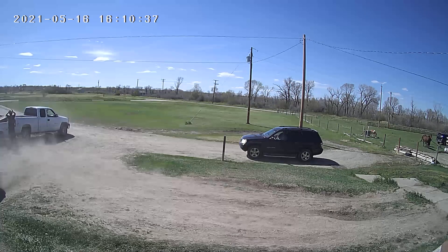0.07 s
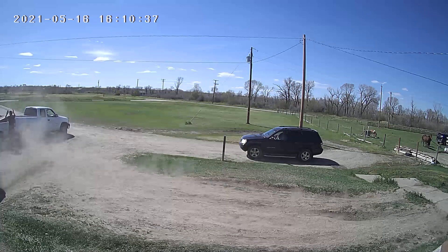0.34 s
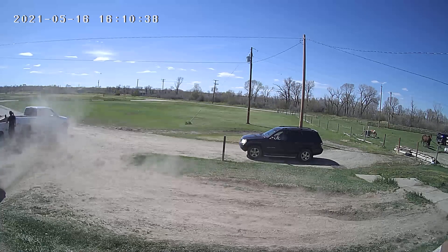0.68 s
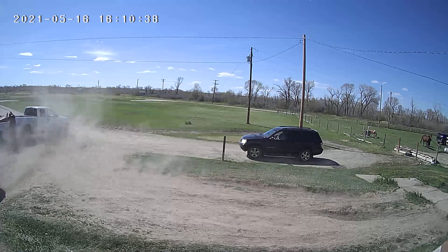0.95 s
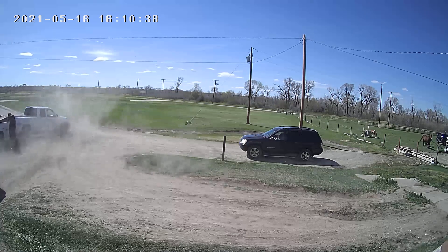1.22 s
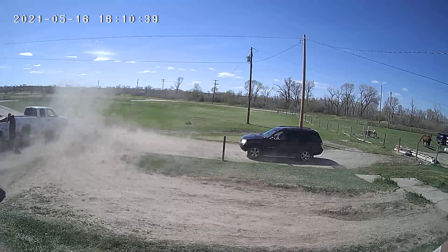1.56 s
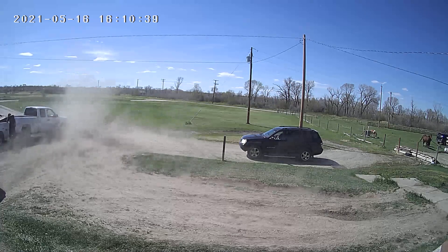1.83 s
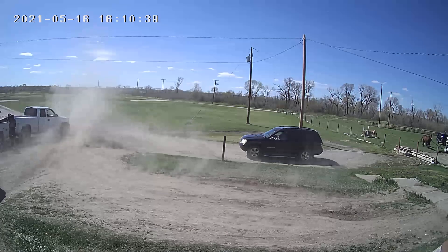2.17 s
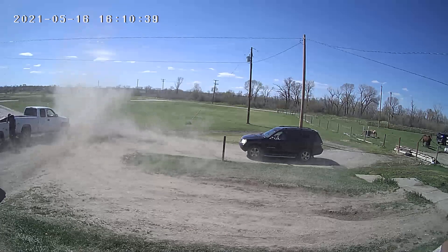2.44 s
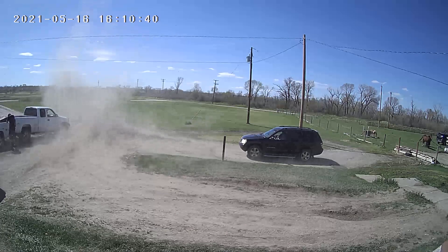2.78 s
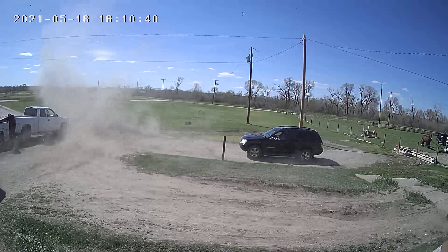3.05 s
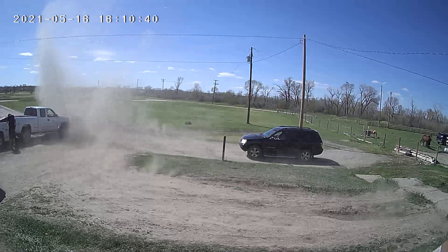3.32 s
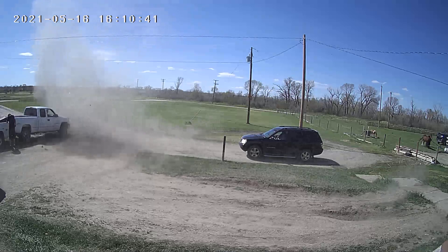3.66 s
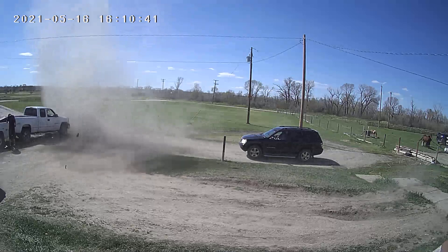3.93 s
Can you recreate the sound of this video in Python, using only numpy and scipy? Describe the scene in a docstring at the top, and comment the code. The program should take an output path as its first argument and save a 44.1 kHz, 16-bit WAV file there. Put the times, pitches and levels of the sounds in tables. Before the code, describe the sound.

Rough wind buffets a microphone outdoors, sounding narrow and distorted. A heavy opening gust breaks into choked bursts that pop and crackle; after a final big push, the wind drops and a thin whistle flares.

```python
"""Gusty wind hits a small outdoor microphone, heard through a narrow channel. It opens on a strong gust
that drives the diaphragm against its limits in rough, lopsided thumps. From 1 s the wind turns choppy:
eddies break through as hard pops, a thin whistling hiss shows in the lulls, and the hardest slaps
overload the channel and crackle. Sustained pushes pin the diaphragm and choke the sound; at 1.7 s it
briefly drops out. A last big shove lands at 3.3 s, then the wind sinks and the whistle flares."""
import sys
import numpy as np
from scipy import signal
from scipy.fft import rfft, irfft, next_fast_len
from scipy.io import wavfile
from scipy.ndimage import map_coordinates

SR = 44100
rng = np.random.default_rng(int(sys.argv[2]) if len(sys.argv) > 2 else 0)


def wav_out(sig):
    """Save sig, one row per channel (or a flat mono array), as 16-bit PCM at SR to the path in sys.argv[1]."""
    wavfile.write(sys.argv[1], SR, np.round(np.clip(np.atleast_2d(sig).T, -1, 1) * 32767).astype(np.int16))


N = 176400

# Gust envelope: t/s, force level/dB re the diaphragm's limit, fine eddies level/dB re the force
GUSTS = [(0, 11.5, -13.5), (.15, 5, -15), (.27, 10, -16.5), (.42, 11.5, -25.5), (.5, 10.5, -11.5),
         (.6, 3, -16), (.69, 3.5, -9.5), (.83, 6.5, -11), (.89, 7, -26), (.92, -0.5, -37), (.96, -22.5, -4),
         (.99, 6.5, -30.5), (1.02, -9.5, -13.5), (1.08, -2, -29.5), (1.12, -12.5, -19), (1.22, -5.5, -13.5),
         (1.27, 2, -5), (1.35, 3, -8), (1.45, 3.5, 2), (1.57, -0.5, -7), (1.68, -13.5, -6.5),
         (1.75, -2, -24), (1.84, 1.5, -30), (2.01, 2.5, -1), (2.05, -18, -6), (2.09, -15, -6.5),
         (2.12, 0, -33), (2.16, 10, -13.5), (2.21, -19.5, -10), (2.28, 10, -15), (2.36, -1.5, -11.5),
         (2.45, -7, -17), (2.53, 0, -2.5), (2.63, 3, 0), (2.69, -6, -12.5), (2.8, -3, -4), (2.92, -5, -1),
         (2.98, 10, -13), (3.16, 6, -2), (3.21, -7.5, -17), (3.26, -11.5, -9.5), (3.3, 28, -39),
         (3.35, -26, -7.5), (3.43, -11.5, -12.5), (3.47, -26, -9), (3.55, -10.5, -20), (3.63, -26, -10.5),
         (3.67, -6, -29.5), (3.72, -14, -22.5), (3.8, -10, -20.5), (3.86, -36.5, -6), (3.91, -11.5, -14),
         (3.95, -17, -11.5), (4, -11, -31)]
# Mean push that holds the diaphragm to one side: t/s, level/dB re the eddies
LEAN = [(0, -8.5), (.85, -1.5), (1.2, 10), (1.35, 1), (1.6, 5.5), (1.9, 7), (2.1, 6), (2.3, -3), (2.55, 2),
        (2.9, 6), (3.1, -2.5), (3.35, 5), (3.55, -27.5), (4, 2)]
# Sustained pushes that pin the diaphragm: centre t/s, length/s, level/dB re the eddies
STALLS = [(0.035, 0.021, 13.5), (0.099, 0.022, 7), (0.432, 0.014, 19.5), (0.581, 0.006, 25),
          (1.275, 0.012, 34), (1.399, 0.018, 12), (1.47, 0.0087, 26.5), (1.545, 0.017, 26),
          (1.615, 0.03, 14.5), (1.675, 0.017, 8), (1.697, 0.067, 28.5), (1.787, 0.025, 26),
          (1.842, 0.014, 22.5), (1.958, 0.012, 12), (2.18, .018, 27.5), (2.383, 0.017, 13.5),
          (2.552, 0.013, 11.5), (2.707, 0.014, 16.5), (2.831, 0.025, 12.5), (2.859, 0.022, 22),
          (2.923, 0.014, 23.5), (2.964, 0.018, 10.5), (3.193, 0.018, 17), (3.351, .05, 33.5)]
# Rumble of the big eddies: f/Hz, level/dB
RUMBLE_EQ = [(25, -8), (60, 2), (110, -2), (200, -7), (400, -20.5), (800, -50), (2000, -62), (5000, -100)]
# Midrange rasp of the fine eddies: f/Hz, level/dB
RASP_EQ = [(80, -14.5), (250, -4.5), (500, 3.5), (900, -5.5), (1500, -13.5), (2200, -20.5), (3200, -21),
           (4500, -26.5)]
def wind():
    """Pressure at the port: big eddies, puffs of fine ones and a one-sided push that comes and goes."""
    force_db, fine_db = curves(GUSTS)
    lean_db, = curves(LEAN)
    puffs = amp(flutter(depth_db=6, per_second=190)) * noise(RASP_EQ)
    surges = amp(flutter(depth_db=2.5, per_second=55))
    eddies = surges * (noise(RUMBLE_EQ) + amp(fine_db) * puffs / puffs.std())
    lean = amp(lean_db + flutter(depth_db=4, per_second=90))
    stalls = sum(amp(db) * gate(t, length) for t, length, db in STALLS)
    return amp(force_db) * (eddies + lean + stalls)


# Slaps of air: centre t/s, length/s, force level/dB, sputter level/dB re the force
BUFFETS = [(0.058, 0.011, -4, 0), (0.132, 0.033, -1.5, -9.5), (0.262, .006, 17, -2.5),
           (0.277, 0.012, 2, -1.5), (0.331, 0.0052, -0.5, 2.5), (0.453, 0.0087, 11.5, 0.5),
           (0.477, 0.012, 19, -20), (0.485, 0.0062, 4.5, 5), (0.814, .036, -1, -8),
           (0.988, 0.0094, -6, -2.5), (1.411, 0.028, 4.5, 8), (1.451, 0.0047, 11, -3.5),
           (1.491, 0.0051, 13.5, 4), (1.516, 0.03, 5, -3.5), (1.566, 0.0063, 2, -2.5),
           (1.645, 0.017, -6.5, -3), (1.659, 0.0052, -5.5, -1), (1.75, 0.025, -3, -4.5),
           (1.776, 0.013, -7, 6), (1.853, 0.021, -7.5, -3.5), (1.882, 0.017, -6.5, -6.5),
           (1.982, 0.028, -12, -13.5), (2.146, 0.009, -3, -2.5), (2.538, 0.0077, 12, -4),
           (2.559, 0.0091, -2.5, 2), (2.625, 0.012, -1.5, 2.5), (2.685, 0.026, 4, -9.5),
           (2.75, 0.012, 4.5, -9), (2.861, 0.0024, -6, -2.5), (2.888, 0.0045, -22.5, 5.5),
           (2.905, 0.013, -5.5, 5.5), (2.996, 0.022, -2, -7), (3.058, 0.0097, 5.5, -12.5),
           (3.098, .03, 7.5, -11), (3.128, 0.021, -5, 2.5), (3.154, 0.012, 1.5, 4.5),
           (3.301, .04, 1.5, -11), (3.433, 0.021, -12.5, -13.5)]
# Low body of a buffet: f/Hz, level/dB
THUMP_EQ = [(40, -35.5), (90, 4), (160, 2), (260, 2.5), (450, -6.5), (900, -47.5), (3000, -93.5)]
def buffets(pressure):
    """Each buffet takes over from the wind and knocks the diaphragm free with a thump and a sputter."""
    thump = noise(THUMP_EQ) + 0.76  # one-sided push
    sputter = amp(flutter(depth_db=6.5, per_second=300)) * noise(RASP_EQ)
    for t, length, db, sputter_db in BUFFETS:
        mix = gate(t, length)
        pressure = (1 - mix) * pressure + mix * amp(db) * (thump + amp(sputter_db) * sputter)
    return pressure


def diaphragm(pressure):
    """Follows the pressure up to its limit and barely gives beyond; a held deflection leaks away."""
    give, trim_db = 0.058, -9
    travel = soft_clip(pressure, knee=2.4) + give * np.arcsinh(pressure)
    bass_cut = signal.butter(2, 109, "high", fs=SR, output="sos")
    return amp(trim_db) * signal.sosfilt(bass_cut, travel)


# Single eddies, big ones thump and small ones pop: centre t/s, level/dB, f/Hz
POPS = [(.371, -7.5, 400), (.818, -9.5, 200), (.979, -8.5, 742), (1.331, -7.5, 653), (1.481, -13.5, 646),
        (1.583, -6.5, 810), (1.683, -9.5, 682), (1.692, -12, 508), (1.746, -10, 123), (1.824, -9, 150),
        (1.929, -12.5, 580), (1.953, -8, 796), (2.0, -10, 1160), (2.058, -16, 550), (2.12, -5, 109),
        (2.149, -6.5, 221), (2.169, -14, 620), (2.61, -10, 1057), (2.686, -2.5, 200.3), (2.743, -8.5, 1400),
        (2.879, -11, 800), (2.976, -6.5, 210), (3.008, -6, 488), (3.37, -18.5, 460)]
# Bright grit on pops and cracks: f/Hz, level/dB
RATTLE_EQ = [(200, -12.5), (900, 3), (2000, -5.5), (2900, -1.5), (4000, -8), (5000, -4)]
def pops(x):
    """Each single eddy ducks the wind and swings the diaphragm a few times, bending in pitch."""
    swings, glide, duck = 2.5, .15, .7
    grit_per_hz = .0005  # higher pops are rougher
    rattle = noise(RATTLE_EQ)
    for t, db, hz in POPS:
        phase, bend = rng.uniform(-1, 1, 2)
        cycles = np.clip((np.arange(N) / SR - t) * hz, -swings, swings)
        swing = np.sin(2 * np.pi * (cycles + glide * bend * cycles ** 2 + phase))
        mix = swell(t, swings / hz)
        x = (1 - duck * mix) * x + amp(db) * mix * (swing + grit_per_hz * hz * rattle)
    return x


CEILING = .72  # the channel clips here
# Sharp overload cracks: centre t/s, peak level/dB re the ceiling, before clipping
CRACKS = [(0.037, 0), (0.067, 1), (1.411, 3.5), (1.416, 1.5), (1.494, 2), (1.518, 0), (1.663, 1.5),
          (2.152, 0), (2.637, 5), (2.854, 2.5)]
def cracks(x):
    """Each crack swamps the signal with a burst of bright rattle that overloads the channel."""
    rattle = np.tanh(2 * noise(RATTLE_EQ))
    channel_swing = np.abs(channel(rattle))
    for t, db in CRACKS:
        mix = gate(t, length=0.0024)
        gain = CEILING * amp(db) / np.max(mix * channel_swing)
        x = (1 - mix) * x + gain * mix * rattle
    return x


# Whistle envelope: t/s, level/dB re the diaphragm's limit
WHISTLE_SWELLS = [(0, -39.5), (.7, -25), (.93, -35.5), (1.03, -28.5), (1.15, -23), (1.19, -30), (1.36, -13),
                  (1.82, -30.5), (2.08, -39.5), (2.35, -33), (2.78, -22), (3.2, -45), (3.455, -64),
                  (3.48, -17), (3.505, -19), (3.54, -44.5), (3.68, -32), (3.82, -27), (3.87, -55.5),
                  (3.91, -30), (3.97, -27.5), (4, -25)]
# Thin, peaky whistle tone: f/Hz, level/dB
WHISTLE_EQ = [(300, -11), (1300, -32), (1850, -7), (2350, -12.5), (2650, 4), (2850, 5.5), (3200, 1.5),
              (3600, -12), (4500, -21.5)]
def whistle():
    """A narrow hiss that swells, flutters and fades."""
    level_db, = curves(WHISTLE_SWELLS)
    return amp(level_db + flutter(depth_db=3.5, per_second=110)) * noise(WHISTLE_EQ)


# Noise floor: f/Hz, level/dB
HISS_EQ = [(100, -3.5), (500, 0.5), (1500, -5), (3000, -8.5), (4500, -6.5)]
def hiss():
    """A faint, steady bed of hiss."""
    return amp(-49.5) * noise(HISS_EQ)


# Channel passband: f/Hz, level/dB
CHANNEL_EQ = [(20, -21), (35, -17), (50, -10.5), (90, 0.5), (200, 1), (500, 2.5), (1200, 0.5), (2200, 1),
              (3000, 1), (3700, -2), (4100, -8), (4400, -23.5), (4700, -49), (6000, -82)]
def channel(x):
    """The narrow channel thins the sub-bass and cuts off steeply above 4 kHz."""
    return equalise(x, CHANNEL_EQ)


def amp(db):
    """Decibels to gain."""
    return 10 ** (np.asarray(db) / 20)


def curves(rows):
    """One envelope for each column after the time."""
    times, *columns = np.transpose(rows)
    return [np.interp(np.arange(N) / SR, times, column) for column in columns]


def flutter(depth_db, per_second):
    """A level wobble in dB, gliding through per_second random points a second."""
    position = np.arange(N) * per_second / SR
    return depth_db * map_coordinates(rng.standard_normal(N // 10), [position], mode="wrap")


def swell(centre, length):
    """A rounded rise and fall of height 1."""
    offset = (np.arange(N) / SR - centre) / length
    return np.maximum(1 - (2 * offset) ** 2, 0)


def gate(centre, length):
    """A steep rise, a hold at 1 and a steep fall."""
    return np.minimum(2.09 * swell(centre, length), 1)


def soft_clip(x, knee):
    """Rounds off at 1; a higher knee is harder."""
    return x / (1 + np.abs(x) ** knee) ** (1 / knee)


def filtered(x, response):
    """Applies a gain given as a function of frequency."""
    size = next_fast_len(N + SR // 2)
    hz = np.fft.rfftfreq(size, 1 / SR)
    return irfft(rfft(x, size) * response(hz), size)[:N]


def equalise(x, eq):
    """Applies an EQ curve, its points joined on a log frequency axis."""
    f, db = np.transpose(eq)
    return filtered(x, lambda hz: amp(np.interp(np.log(hz + 1), np.log(f + 1), db)))


def noise(eq):
    """Coloured noise of rms 1."""
    x = equalise(rng.standard_normal(N), eq)
    return x / x.std()


def scene():
    """Wind and whistle share one diaphragm, so strong wind chokes the whistle."""
    pressure = buffets(wind()) + whistle()
    mic = pops(diaphragm(pressure))
    preamp_limit = 0.61  # the preamp rounds the thumps
    rounded = preamp_limit * soft_clip(mic / preamp_limit, knee=6)
    sound = cracks(rounded) + hiss()
    dropout = 1 - .9 * gate(centre=1.709, length=.03)
    return (sound * dropout)[None]


def record(dry):
    """A narrow channel, then hard clipping that spills into the treble."""
    clipped = CEILING * soft_clip(channel(dry[0]) / CEILING, knee=36)
    top_hz = 16500
    return filtered(clipped, lambda hz: 1 / (1 + (hz / top_hz) ** 40))[None]


dry = scene()
out = record(dry)
wav_out(out)
```